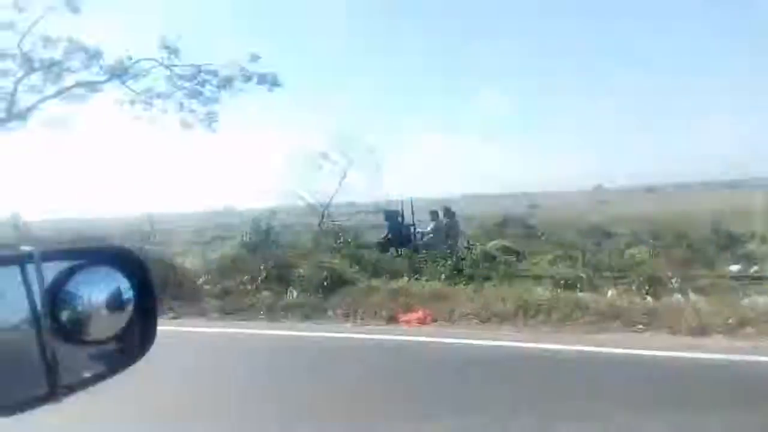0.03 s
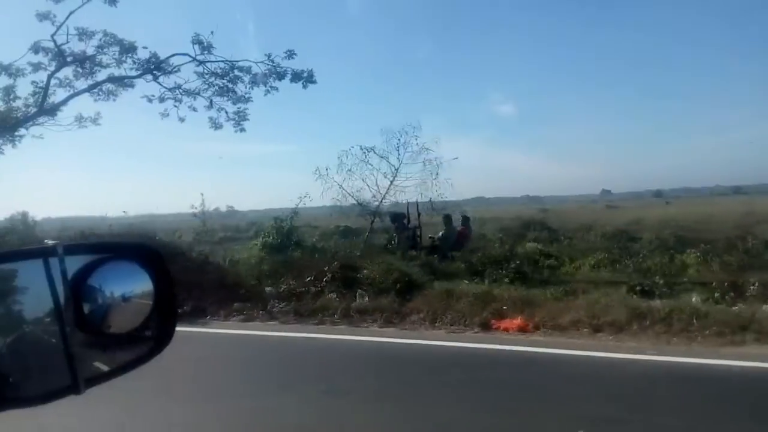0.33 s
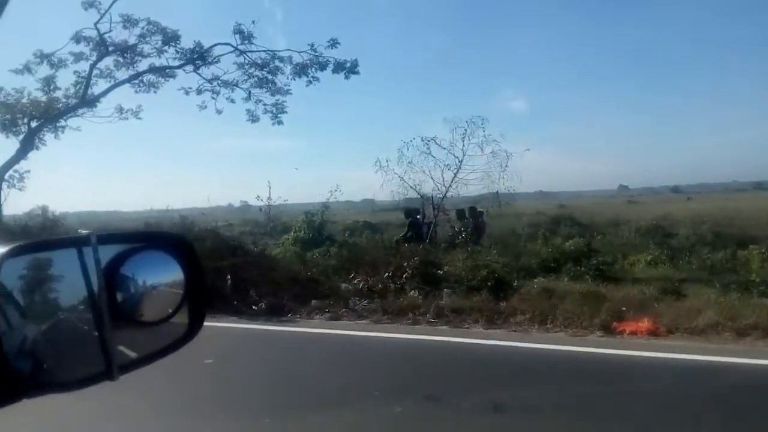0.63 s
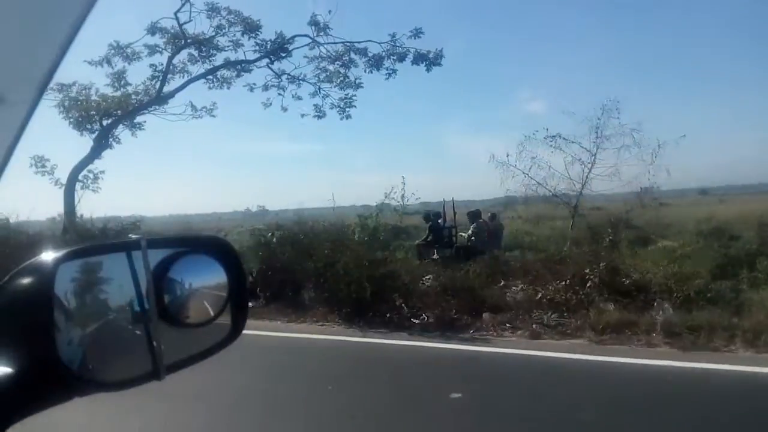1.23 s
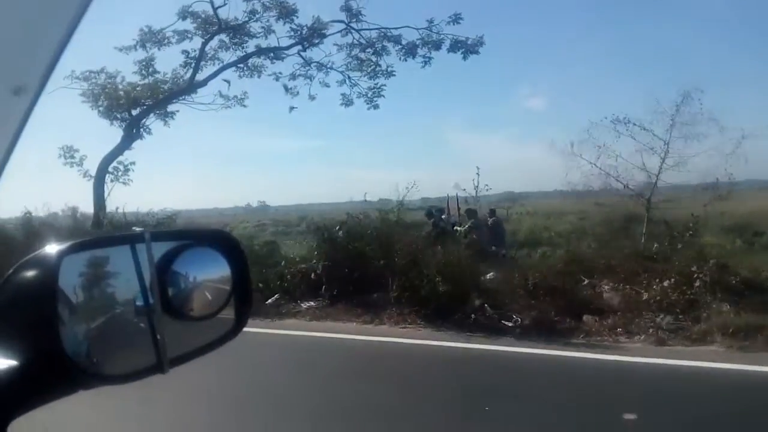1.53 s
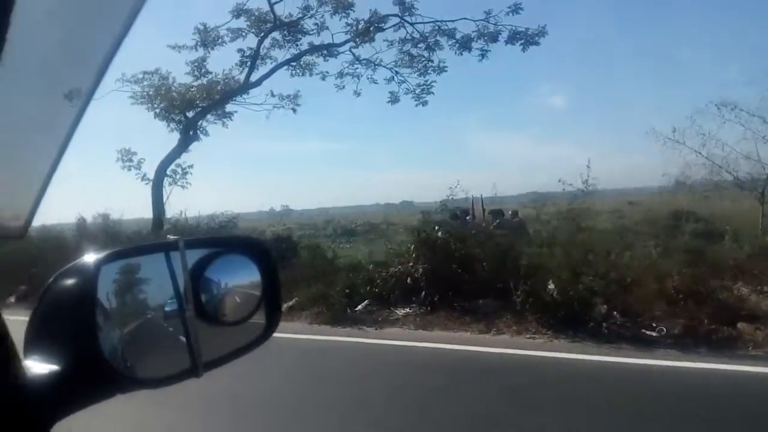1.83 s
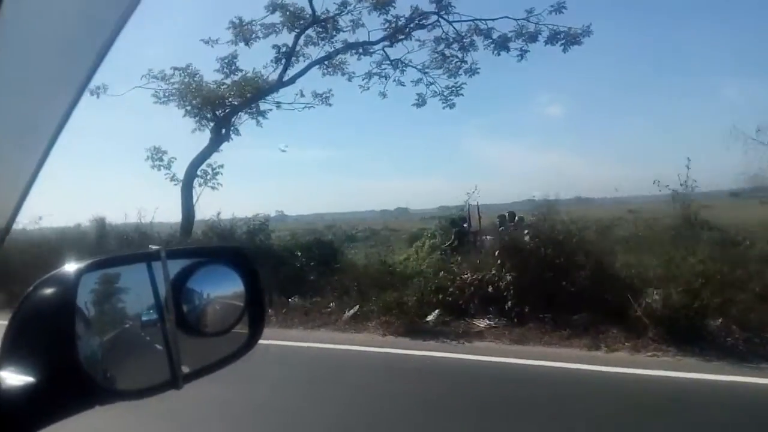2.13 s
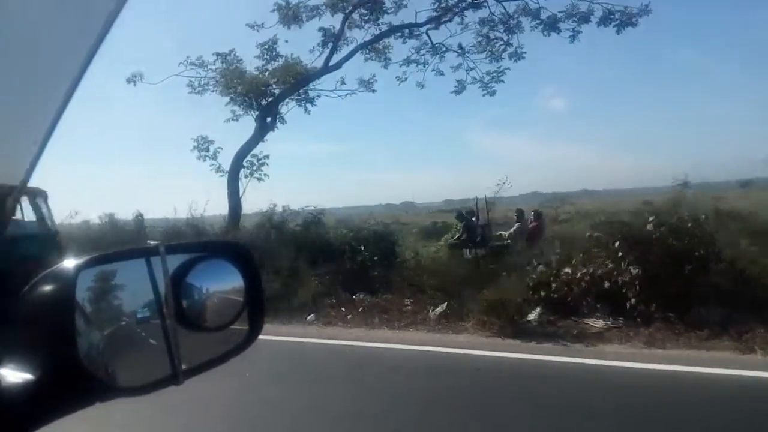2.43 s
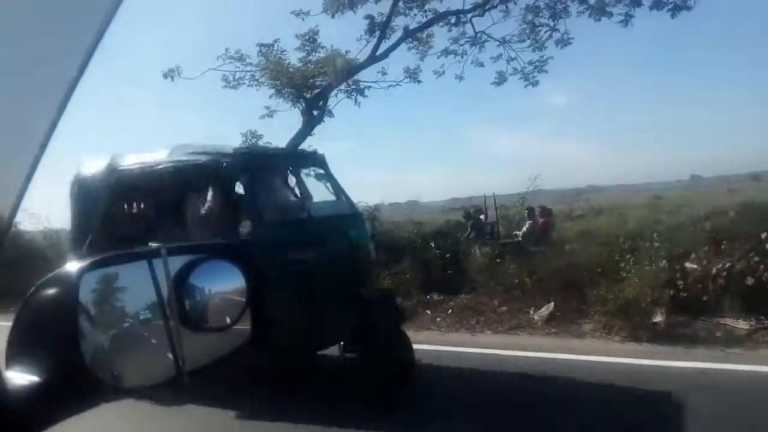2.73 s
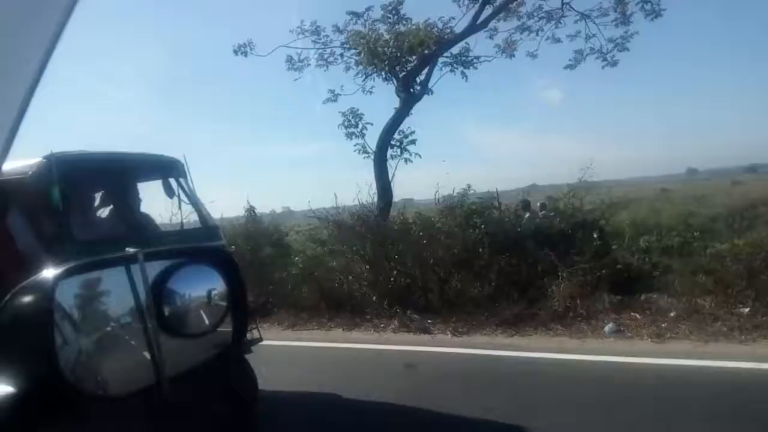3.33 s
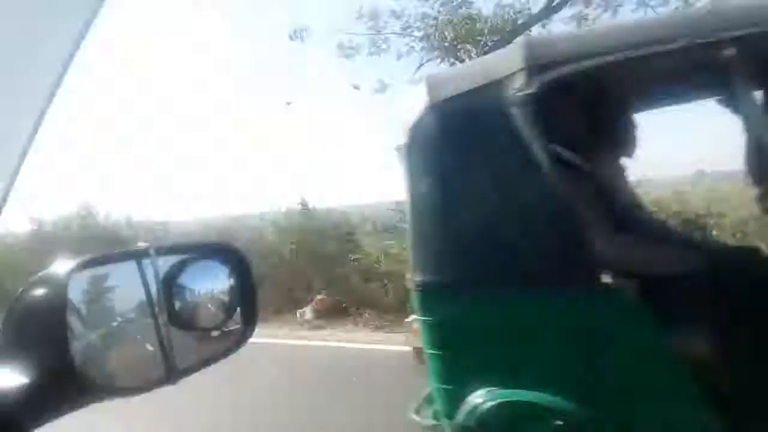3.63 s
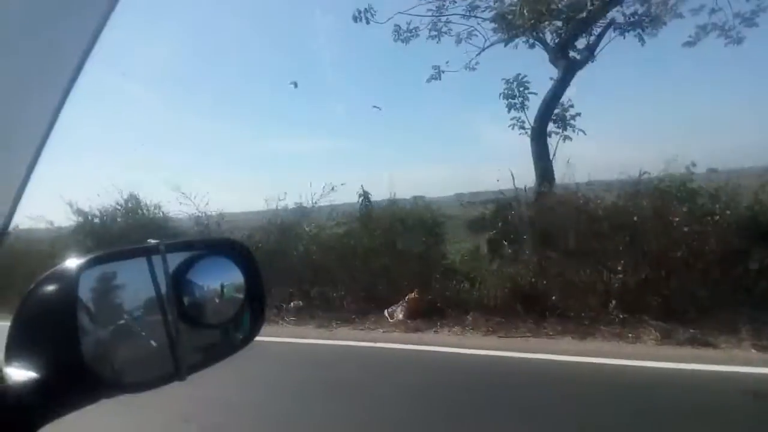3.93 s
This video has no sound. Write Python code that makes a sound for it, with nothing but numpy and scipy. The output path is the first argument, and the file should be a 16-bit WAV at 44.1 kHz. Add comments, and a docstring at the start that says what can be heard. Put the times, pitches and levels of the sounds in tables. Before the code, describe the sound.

Low road and engine rumble inside a car, with three-wheelers clattering past the open window.

```python
"""Inside a moving car with the side window open. The road shakes the cabin into a boom, the engine
hums on its low orders, and air hisses and whistles at the window. A bump knocks a panel once, and
loose fittings click. One vehicle falls behind at the start; later two three-wheelers are overtaken,
with exhaust drone, tyre rush, short squeals and a clatter that pulses with each engine firing."""
import sys
import numpy as np
from scipy import signal
from scipy.fft import rfft, irfft
from scipy.io import wavfile

SR = 44100
rng = np.random.default_rng(int(sys.argv[2]) if len(sys.argv) > 2 else 0)


def to_wav(s):
    """Save 16-bit WAV."""
    ch = np.atleast_2d(s).T  # columns
    pcm = np.round(np.clip(ch, -1, 1) * 32767)  # PCM
    wavfile.write(sys.argv[1], SR, pcm.astype(np.int16))


N = 176400
T = np.arange(N) / SR
HZ = np.maximum(np.arange(N // 2 + 1) * SR / N, 1)

# How alike the two microphones hear noise. Each row: frequency in Hz, correlation.
STEREO_LIKENESS = [(50, .99), (120, .98), (240, .92), (490, .56), (990, 0), (2000, -.12), (4000, 0),
                   (8000, .03)]
# The lean of the stereo image. Each row: frequency in Hz, left minus right in dB.
STEREO_BALANCE = [(30, 5), (120, 2.5), (190, 3.5), (280, 4), (600, 3), (1200, 1), (2200, 0), (4000, 3),
                  (7000, 4), (13000, 1)]
# How far the left microphone leads. Each row: frequency in Hz, phase in radians.
LEFT_LEAD = [(32, -0.11), (55, -0.32), (120, 0.13), (240, -0.51), (400, 0.51), (650, -0.8)]
# The window is nearer the left microphone. Each row: frequency in Hz, extra left minus right in dB.
WINDOW_PAN = [(1500, 0), (2600, 3), (3500, 12), (6500, 6.5), (9000, 6)]

# The colour of the road rumble. Each row: frequency in Hz, relative level in dB.
RUMBLE_COLOUR = [(18, -33), (30, -14), (39, 1.5), (66, -4.5), (88, -1.5), (104, -7.5), (150, -12),
                 (215, -18.5), (270, -22), (350, -24), (450, -28.5), (650, -32.5), (810, -39),
                 (1100, -45.5), (1450, -65.5), (3000, -79.5)]
# How hard the road shakes the cabin. Each row: time in seconds, rumble level in dB.
RUMBLE_LEVEL = [(0, -28), (0.3, -31), (0.6, -33), (0.82, -33), (1.05, -33), (1.26, -33), (1.5, -34.5),
                (2.05, -34.5), (2.23, -32), (2.45, -34.5), (2.7, -36), (3.1, -37), (3.42, -33.5),
                (3.52, -30), (3.62, -32), (4, -44.5)]
# Cabin and window resonances. Each row: centre in Hz, width in Hz, level in dB.
CABIN_BOOMS = [(55, 11, -39), (123.7, 15, -42.5), (182.7, 8.7, -42), (239.8, 6.3, -54.5),
               (299.9, 14, -50.5), (330, 45, -63), (713, 43, -63.5), (870, 7.9, -71), (1223, 19, -75.5),
               (1530, 40, -86.5)]
# The pace of the car's engine. Each row: time in seconds, firing rate in Hz.
FIRING_RATE = [(0, 40.89), (1.2, 41), (2.1, 39.48), (2.8, 41), (3.5, 41.01), (4, 42.27)]
# The engine's harmonics. Each row: multiple of the firing rate, relative level in dB.
ENGINE_ORDERS = [(1, -14.5), (2, -1.5), (3, -2.5), (4, -11)]
# The swell of the engine hum. Each row: time in seconds, level in dB.
HUM_LEVEL = [(0, -53), (0.55, -57.5), (0.78, -33.5), (1.05, -44.5), (2.4, -44), (2.85, -34), (3.1, -33),
             (3.55, -34), (3.72, -43.5), (4, -35.5)]
# The colour of the air at the window. Each row: frequency in Hz, relative level in dB.
AIR_COLOUR = [(700, -7), (1500, -3.5), (2000, -7), (2500, 4), (3100, -4), (4300, 3.5), (5200, -0.5),
              (6500, 0.5), (7400, -7), (8400, -11.5), (12000, -11), (15500, -17)]

# Swelling tones. Each row: peak time in seconds, level in dB, pitch in Hz, width in Hz,
# spread in seconds.
AIR_WHISTLES = [(0.58, -73, 4000, 1380, 0.27), (2.0, -84, 3970, 350, 1.4), (2.75, -71, 3450, 201, 0.22),
                (2.8, -67, 2570, 90.4, .14), (2.97, -66.5, 4030, 259, .1), (3.04, -70, 5960, 128, 0.024),
                (3.05, -71, 5000, 348, 0.085), (3.1, -67.5, 3300, 150, 0.11), (3.64, -61, 3780, 900, 0.11),
                (3.96, -60.5, 5130, 131, 0.027)]  # thin, at the window
TRIM_SQUEAKS = [(1.252, -67.5, 4760, 350, .014), (1.259, -71, 3900, 352, 0.033)]  # brief, from the trim
VEHICLE_TONES = [(0.03, -55.5, 1617, 50, 0.03), (0.05, -40.5, 188.3, 4.8, 0.097),
                 (0.05, -45, 283, 18, 0.088), (0.05, -54, 240.4, 5.6, .12), (0.05, -53.5, 1206, 17, 0.066),
                 (0.1, -60, 2800, 200, 0.13), (0.1, -63, 4540, 400, 0.089), (2.78, -60, 3100, 500, .03),
                 (3.0, -54.5, 637, 27, 0.39), (3.13, -49.5, 483, 7.3, 0.05), (3.24, -60, 617, 13, .06),
                 (3.19, -34.5, 180.2, 8, 0.12), (3.85, -31.5, 85.6, 8, .05), (3.9, -32.5, 160, 16, 0.05),
                 (3.91, -47.5, 598, 18, .05), (3.9, -44, 296, 19, 0.042), (3.85, -40.5, 127.3, 12, 0.23)]  # as other vehicles draw level
VEHICLE_SQUEALS = [(3.05, -59.5, 1168, 18, .05), (3.24, -58.5, 1255, 45, .025),
                   (3.315, -55.5, 1290, 40, .035), (3.77, -54.5, 1295, 45, .02),
                   (3.9, -52.5, 1245, 100, .06)]  # from the three-wheelers

# Loose fittings. Each row: start in seconds, body level in dB, centre in Hz, width in octaves,
# time to fall 60 dB in seconds, bright edge level in dB.
FITTING_CLICKS = [(0.3463, -53, 5930, .4, 0.025, -64), (2.183, -58.5, 2600, 0.64, 0.075, -80),
                  (2.8437, -41.5, 3300, 0.46, 0.041, -52), (2.8471, -22.5, 5700, .9, 0.0036, -38),
                  (2.8505, -49, 3300, 0.83, 0.076, -58), (2.8635, -59, 2500, 1, 0.012, -50),
                  (2.88, -42.5, 3700, 0.55, 0.033, -67), (3.3563, -41, 3200, 0.74, 0.033, -54),
                  (3.3578, -40, 1450, 0.22, .025, -79), (3.366, -57, 4830, .6, 0.061, -68),
                  (3.5035, -44, 2880, 0.91, 0.047, -62), (3.5055, -36, 1600, 0.099, 0.022, -74),
                  (3.729, -57, 3300, 0.7, 0.23, -69), (3.801, -44, 2210, 1.1, 0.058, -53.5),
                  (3.822, -58.5, 5800, 0.71, 0.43, -62.5), (3.876, -41.5, 5830, 0.25, 0.016, -60)]
# The ring of the knocked panel. Each row: pitch in Hz, level in dB, time to fall 60 dB in seconds.
PANEL_MODES = [(329, -25.5, 0.09), (398, -33.5, 0.062), (560, -53, 0.037), (920, -49, 0.1),
               (1490, -56, .03), (5050, -54.5, 0.036), (5440, -56, 0.025), (6290, -46, 0.028),
               (6500, -57, 0.023), (8840, -67, 0.082)]

# Other vehicles, heard through the window. Each row: time in seconds, then the levels in dB of
# drone, tyre rush, clatter and top hiss.
TRAFFIC_LEVELS = [(0, -30.5, -45, -49, -62), (.12, -54, -46.5, -54.5, -64.5),
                  (.3, -50.5, -54, -60.5, -75.5), (.55, -51.5, -55.5, -65, -85),
                  (.9, -50.5, -73.5, -74.5, -92), (1.7, -64, -66, -75.5, -93),
                  (2.3, -48, -61.5, -69.5, -86.5), (2.65, -43, -56.5, -68.5, -94.5),
                  (2.85, -52, -52.5, -57.5, -85.5), (3.08, -37.5, -50.5, -54.5, -71),
                  (3.24, -43, -48.5, -60.5, -71.5), (3.38, -42, -46.5, -54, -61),
                  (3.55, -49.5, -49.5, -54, -76), (3.68, -41, -45.5, -53, -67),
                  (3.83, -48, -46, -52.5, -59), (3.92, -39, -44.5, -52, -64), (4, -44, -45.5, -53, -61.5)]
# The colours of those four layers. Each row: frequency in Hz, relative level in dB.
DRONE_COLOUR = [(80, -27), (130, -8), (180, 0), (220, -6.5), (300, -8), (380, -15), (600, -31),
                (1500, -65.5), (5000, -100)]
TYRE_COLOUR = [(200, -3.5), (350, -2.5), (490, 1), (650, -2.5), (800, -4), (1050, -9), (1280, -6),
               (1600, -14.5), (2500, -47.5), (8000, -75.5)]
CLATTER_COLOUR = [(700, -9.5), (1200, -7), (1650, 10), (2000, 6), (2700, 6.5), (3500, 2.5), (4600, -3.5),
                  (5600, -5.5), (7000, -31), (8500, -28), (15000, -53.5)]
HISS_COLOUR = [(3000, -12.5), (4500, 2.5), (5500, -8.5), (6600, -4.5), (7500, -18.5), (8500, -37.5),
               (11000, -28), (15000, -27.5)]
# The echo between the vehicles. Each row: time in seconds, delay in milliseconds.
ECHO_DELAY = [(0, 2.42), (.6, 2.7), (2.3, 1.44), (3.0, 3.4), (3.3, 3.32), (3.8, 3.02), (4, 3.6)]


def from_db(db):
    """Decibels to gain."""
    return 10 ** (np.asarray(db) / 20)


def unit_rms(x):
    """Scale to an rms of 1."""
    return x / np.sqrt(np.mean(x ** 2) + 1e-20)


def over_time(rows):
    """One curve per sample for each column after the time."""
    times, *columns = np.transpose(rows)
    return [np.interp(T, times, column) for column in columns]


def over_hz(rows):
    """A table spread over the frequency bins, on a log scale."""
    hz, value = np.transpose(rows)
    return np.interp(np.log(HZ), np.log(hz), value)


def filtered(x, response):
    """Shape a sound with one gain per frequency bin."""
    return irfft(rfft(x) * response, N)


def drift(rate_hz):
    """A random wander of rms 1, mostly slower than the given rate."""
    return unit_rms(filtered(rng.standard_normal(N), 1 / (1 + (HZ / rate_hz) ** 2)))


def resonance(hz, width):
    """The steep-skirted response of one resonance."""
    return 1 / (1 + ((HZ ** 2 - hz ** 2) / (HZ * width * 1.5)) ** 2)


def microphones():
    """Left and right responses, each taking half the gap in level and phase."""
    left_over_right = from_db(over_hz(STEREO_BALANCE)) * np.exp(1j * over_hz(LEFT_LEAD))
    return left_over_right ** np.array([[.5], [-.5]])


def noise(response):
    """Coloured stereo noise of rms 1, alike on both sides in the bass and diffuse in the treble."""
    mid, side = rfft(rng.standard_normal((2, N)))
    alike = np.clip(over_hz(STEREO_LIKENESS), -.99, .99)
    pair = np.sqrt(1 + alike) * mid + np.sqrt(1 - alike) * side * [[1], [-1]]
    return unit_rms(irfft(pair * response * microphones(), N))


def swelling_tones(rows, steadiness, flicker_db):
    """Narrow tones swell and fade; steadiness 0 flutters like noise, 1 evens that flutter out."""
    out = 0
    for peak_s, db, hz, width, spread_s in rows:
        band = signal.hilbert(noise(resonance(hz, width)))
        evened = band.real / (np.abs(band) + 1e-9) ** steadiness
        tone = filtered(evened, resonance(hz, 2 * width))
        flicker = from_db(flicker_db * drift(6.9))
        swell = np.exp(-.5 * ((T - peak_s) / spread_s) ** 2)
        out += from_db(db) * swell * unit_rms(tone * flicker)
    return out


def cabin_reflections(x, depth_db=3, spacing_hz=43.64):
    """The cabin's many reflections leave fine peaks and dips above the bass, each side its own."""
    grid = np.arange(0, SR, spacing_hz)
    peaks = np.array([np.interp(HZ, grid, side[:len(grid)]) for side in rng.standard_normal((2, SR))])
    eased = x * signal.windows.tukey(N, .002)
    return filtered(eased, from_db(depth_db * peaks * HZ / (HZ + 600)))


def road_rumble():
    """The road shakes the body into a bed of broad rumble and narrow booms."""
    rumble_db, = over_time(RUMBLE_LEVEL)
    power = sum((from_db(db) * unit_rms(resonance(hz, width))) ** 2 for hz, width, db in CABIN_BOOMS)
    booms = np.sqrt(power.mean()) * noise(np.sqrt(power))
    return from_db(rumble_db) * noise(from_db(over_hz(RUMBLE_COLOUR))) + booms


def engine_hum(pitch_waver=0.01477, flutter_db=2.2, flutter_hz=9):
    """The car's engine hums on low multiples of its firing rate, each unsteady in strength."""
    firing_hz, = over_time(FIRING_RATE)
    hum_db, = over_time(HUM_LEVEL)
    phase = 2 * np.pi * np.cumsum(firing_hz * (1 + pitch_waver * drift(6.38))) / SR
    hum = 0
    for order, db in ENGINE_ORDERS:
        strength = from_db(db + flutter_db * drift(flutter_hz))
        hum += strength * np.sin(order * phase + rng.uniform(0, 2 * np.pi))
    return filtered(from_db(hum_db) * unit_rms(hum), microphones())


def window_air(hiss_db=-74.5):
    """Air hisses and whistles fitfully past the open window on the left, and the trim squeaks."""
    whistles = swelling_tones(AIR_WHISTLES + TRIM_SQUEAKS, steadiness=0.15, flicker_db=2.5)
    hiss = from_db(hiss_db) * noise(from_db(over_hz(AIR_COLOUR)))
    pan = from_db(over_hz(WINDOW_PAN) * np.array([[.5], [-.5]]))
    return filtered(hiss + whistles, pan)


def loose_fittings(attack_s=0.00018, tail_db=-23.5, tail_t60_s=0.13, body_top_hz=7300, edge_hz=9100):
    """Each click is a burst of dense resonances with a bright edge, rattling as it dies away."""
    rattle_db, rattle_hz, rattle_onset_s = 4.0, 170, .006
    out = 0
    for start_s, body_db, hz, octaves, t60, edge_db in FITTING_CLICKS:
        age = np.maximum(T - start_s, 0)
        attack = 1 - np.exp(-age / attack_s)
        decay = from_db(-60 * age / t60) + from_db(tail_db - 60 * age / tail_t60_s)
        rattle = from_db(rattle_db * drift(rattle_hz) * np.minimum(age / rattle_onset_s, 1) ** 2)
        colour = np.exp(-.5 * (np.log2(HZ / hz) / octaves) ** 2) / np.sqrt(1 + (HZ / body_top_hz) ** 20)
        body = unit_rms(filtered(rng.standard_normal((2, N)), colour))
        edge = filtered(rng.standard_normal((2, N)), 1 / (1 + (HZ / edge_hz) ** 2))
        out += attack * decay * rattle * (from_db(body_db) * body + from_db(edge_db) * edge)
    return out


def bump(start_s=.3455, rebound_s=0.0037, rebound_db=-11, bright_above_hz=2000):
    """A bump knocks a panel; its bright modes strike once more on the rebound."""
    knock, rebound = (start_s, 0), (start_s + rebound_s, rebound_db)
    out = 0
    for hz, db, t60 in PANEL_MODES:
        bright = hz > bright_above_hz
        for hit_s, hit_db in [knock, rebound] if bright else [knock]:
            age = np.maximum(T - hit_s, 0)
            decay = (age > 0) * from_db(db + hit_db - 60 * age / t60)
            stereo_phase = bright * rng.uniform(0, 2 * np.pi, (2, 1))
            out += decay * np.sin(2 * np.pi * hz * age + stereo_phase)
    return filtered(out, microphones())


def shimmer(x, depth_db=2.0, rate_hz=21, bands=8):
    """Each band of the treble rises and falls on its own."""
    centres_hz = np.geomspace(900, 7000, bands)
    slices = (filtered(x, np.interp(HZ, centres_hz, share)) for share in np.eye(bands))
    return sum(from_db(depth_db * drift(rate_hz)) * band for band in slices)


def firing_pulse(rate_hz=28.9, depth=0.52, sharpness=1.7, uneven_db=3.5):
    """A gain that jumps at each firing of the passing engines, uneven in pace and punch."""
    cycles = np.cumsum(rate_hz * (1 + 0.087 * drift(16))) / SR
    punch = depth * from_db(uneven_db * drift(25))
    return unit_rms(1 + punch * np.exp(-sharpness * (cycles % 1)))


def grit(colour, ticks_per_s=130, spread_db=5.5, relative_db=-18):
    """Small random ticks roughen the clatter."""
    ticks = (rng.random(N) < ticks_per_s / SR) * from_db(spread_db * rng.standard_normal(N))
    stereo_ticks = ticks * rng.standard_normal((2, N))
    return from_db(relative_db) * unit_rms(filtered(stereo_ticks, colour))


def squeals(shake_db=2.5, shake_hz=45):
    """Short rough squeals from the three-wheelers, broken up by their shaking."""
    shake = unit_rms(from_db(shake_db * drift(shake_hz)))
    return shake * swelling_tones(VEHICLE_SQUEALS, steadiness=0.54, flicker_db=3.0)


def traffic(flutter_db=2.0, flutter_hz=42, echo_gain=0.22):
    """Vehicles alongside: exhaust drone, tyre rush, clatter pulsed by each firing, a shifting echo."""
    drone_gain, tyre_gain, clatter_gain, hiss_gain = from_db(over_time(TRAFFIC_LEVELS))
    colour = from_db(over_hz(CLATTER_COLOUR))
    pulse = firing_pulse()
    ticks = grit(colour)
    tyres = tyre_gain * from_db(flutter_db * drift(flutter_hz)) * noise(from_db(over_hz(TYRE_COLOUR)))
    clatter = clatter_gain * (unit_rms(shimmer(noise(colour))) + ticks)
    hiss = hiss_gain * noise(from_db(over_hz(HISS_COLOUR)))
    direct = tyres + pulse * (clatter + hiss)
    delay_ms, = over_time(ECHO_DELAY)
    echo = np.array([np.interp(T - delay_ms / 1000, T, side) for side in direct])
    drone = drone_gain * noise(from_db(over_hz(DRONE_COLOUR)))
    return direct + echo_gain * echo + drone


def scene():
    """The mix from the seat by the window."""
    outside = cabin_reflections(window_air() + traffic())
    outside += swelling_tones(VEHICLE_TONES, steadiness=0.65, flicker_db=1.3)
    outside += squeals()
    return road_rumble() + engine_hum() + outside + loose_fittings() + bump()


def record(dry):
    """A quick fade at the end and a steep cut of the very top."""
    fade_s, cutoff_hz = .003, 15300
    faded = dry * np.minimum((T[-1] - T) / fade_s, 1)
    return signal.sosfilt(signal.ellip(10, .1, 80, cutoff_hz, fs=SR, output="sos"), faded)


dry = scene()
out = record(dry)
to_wav(out)
```